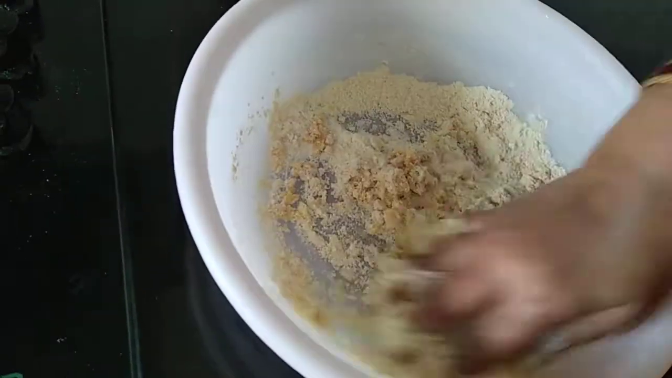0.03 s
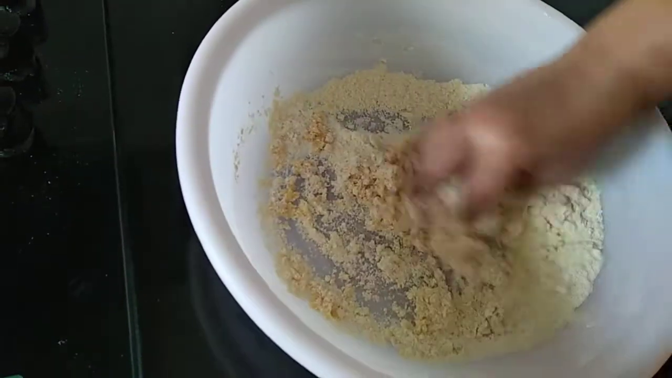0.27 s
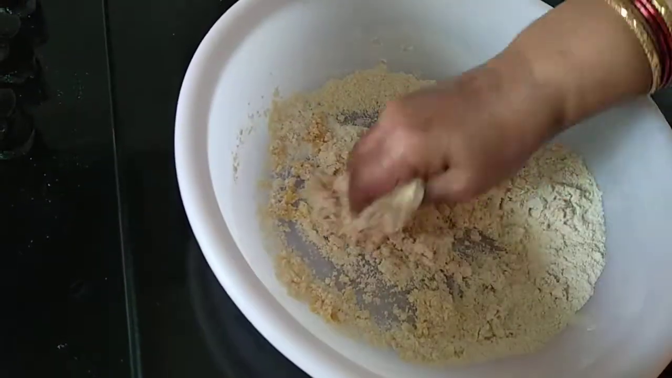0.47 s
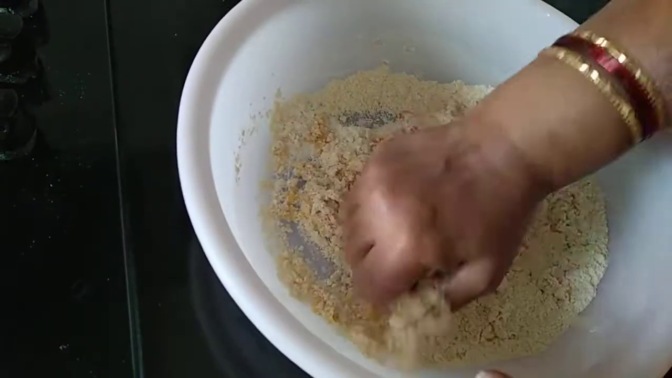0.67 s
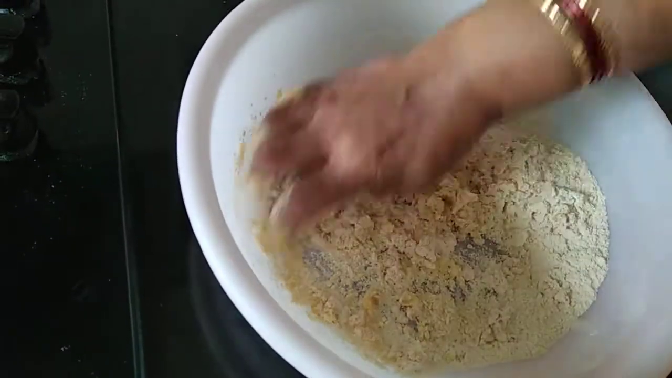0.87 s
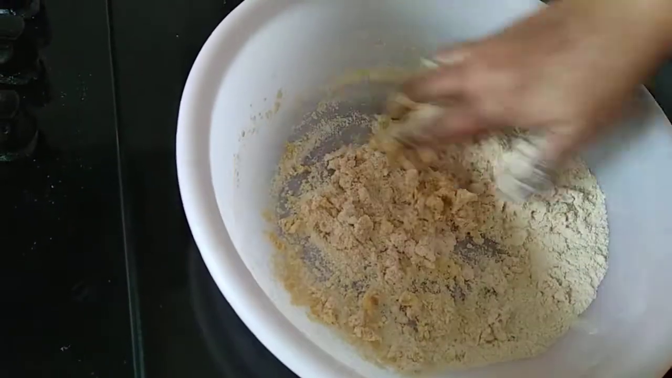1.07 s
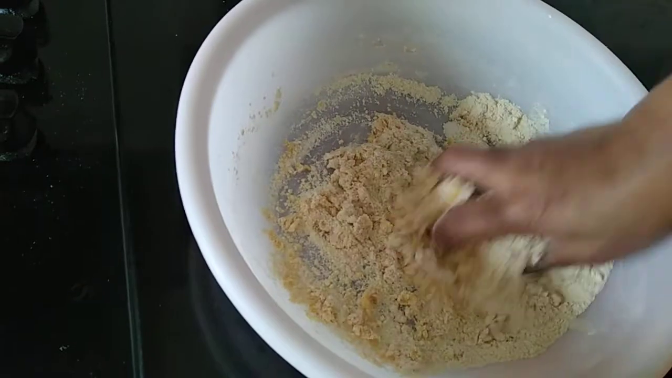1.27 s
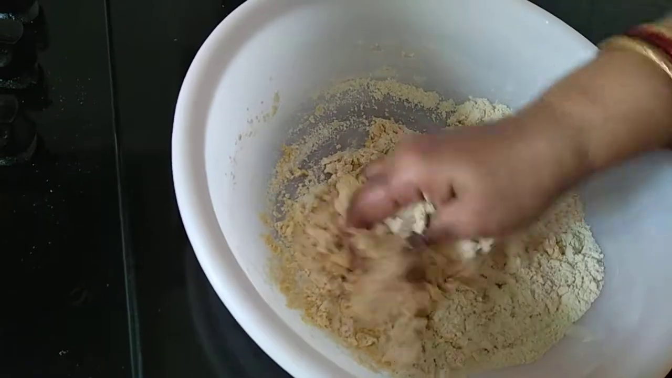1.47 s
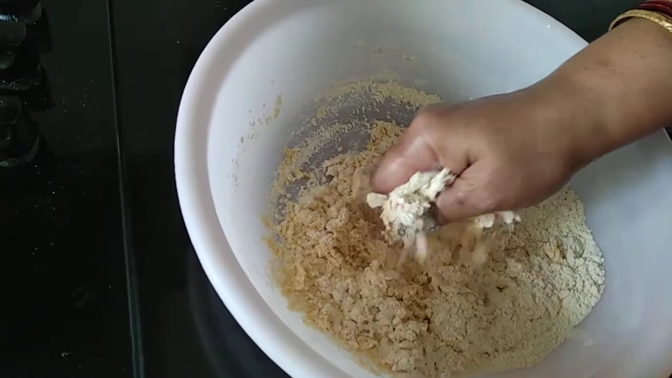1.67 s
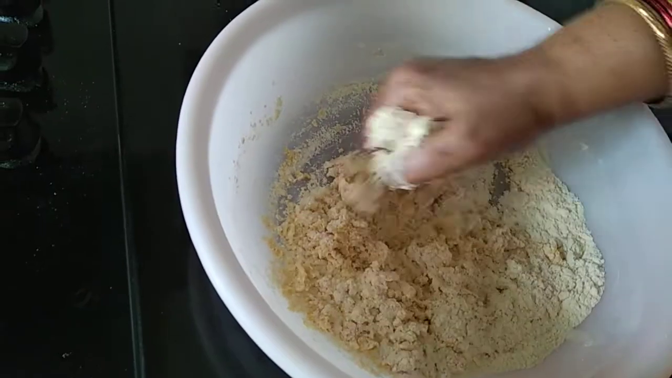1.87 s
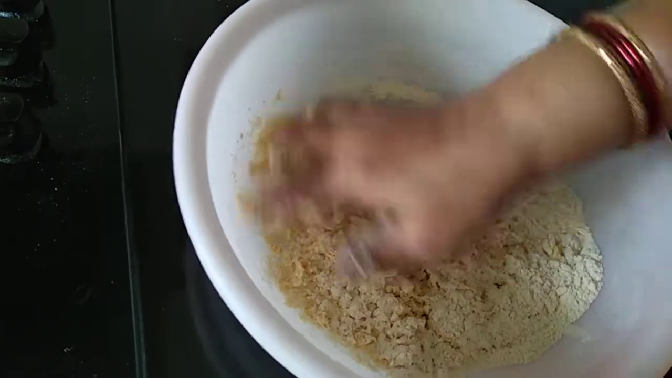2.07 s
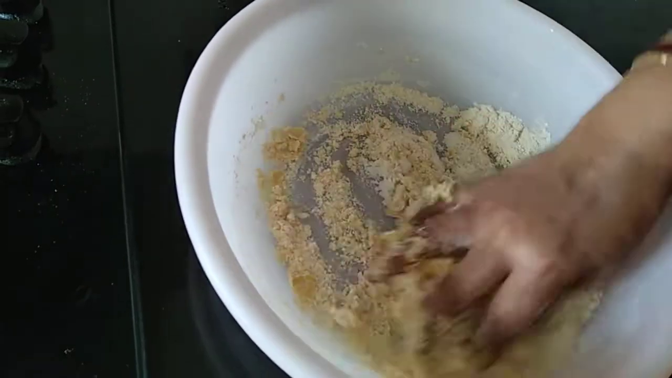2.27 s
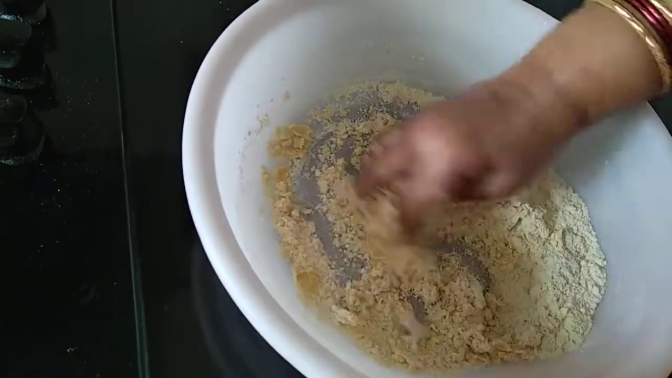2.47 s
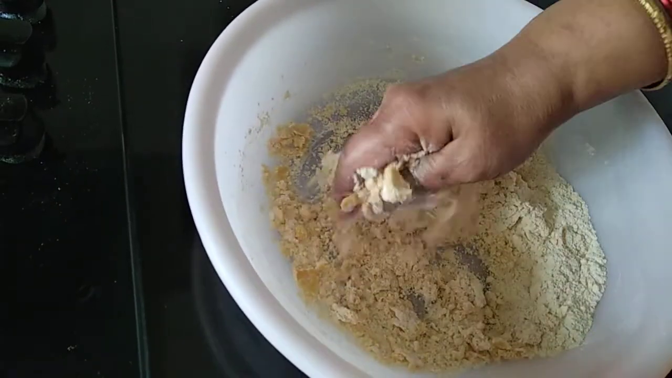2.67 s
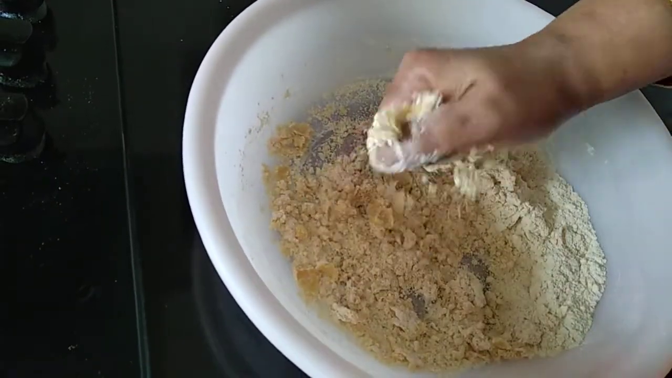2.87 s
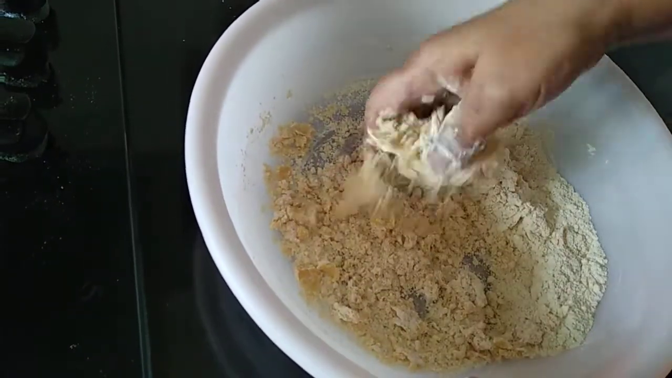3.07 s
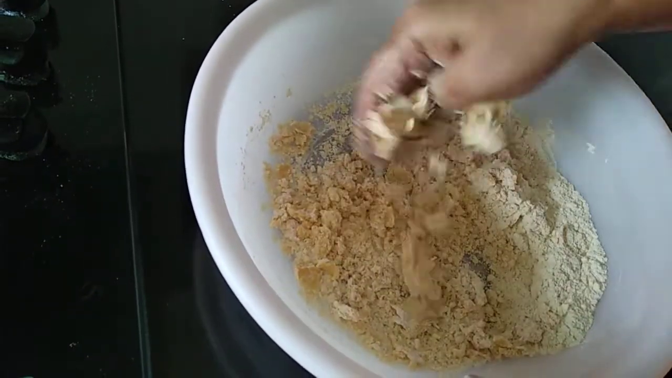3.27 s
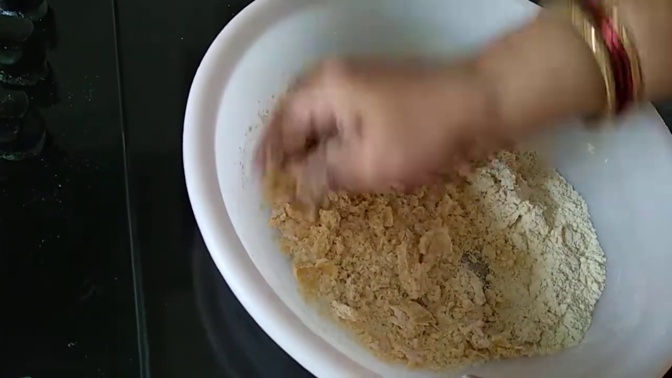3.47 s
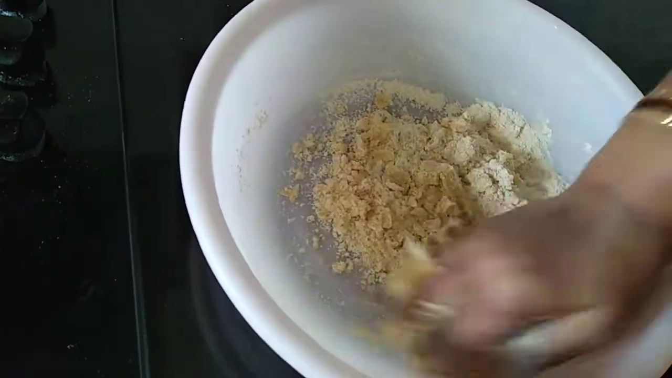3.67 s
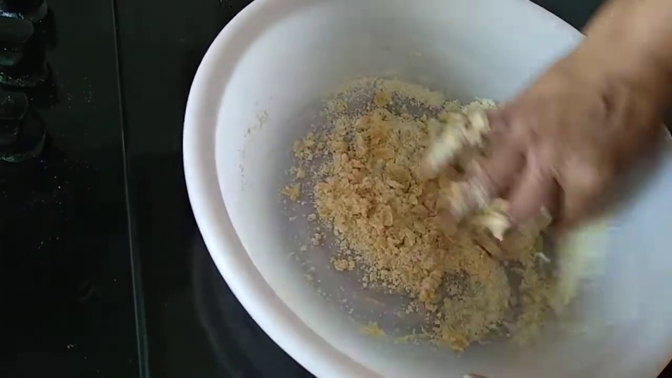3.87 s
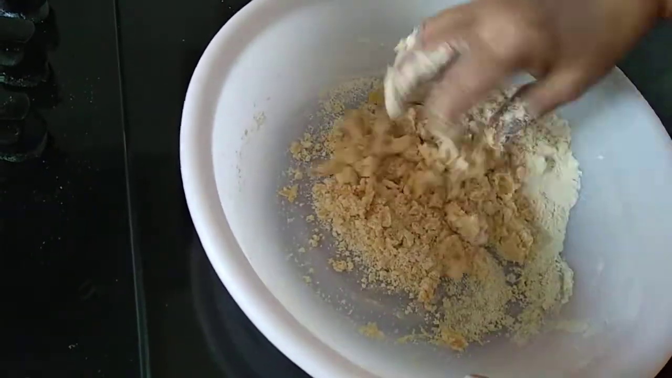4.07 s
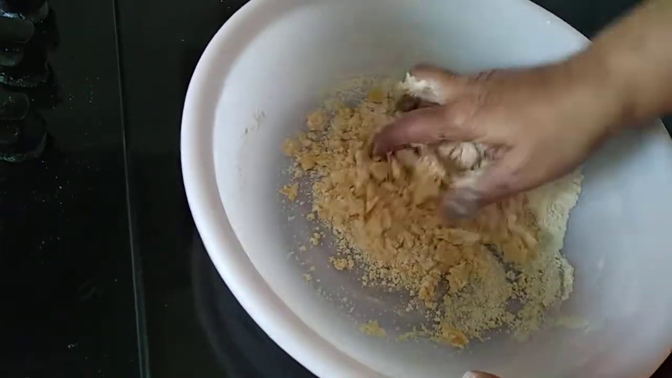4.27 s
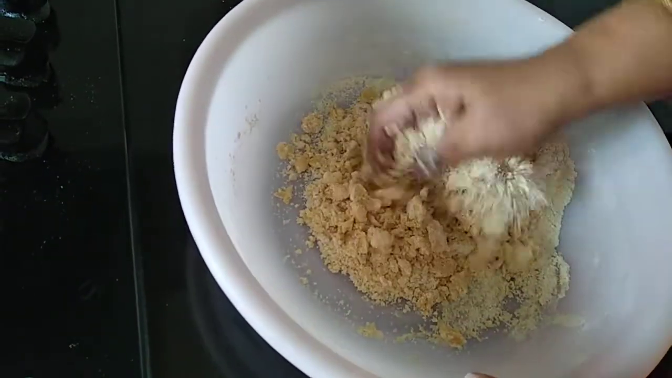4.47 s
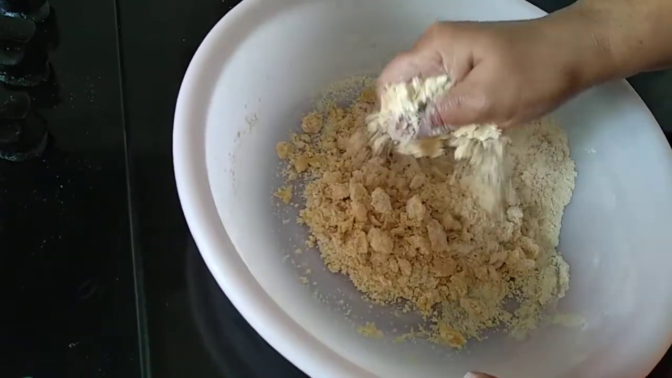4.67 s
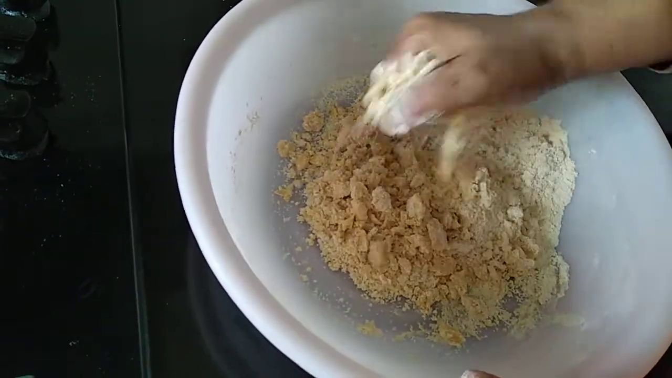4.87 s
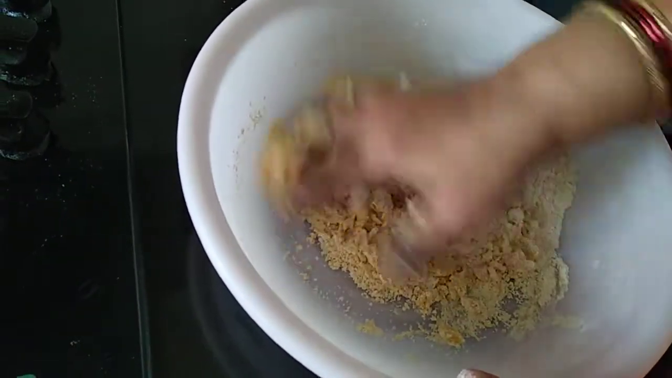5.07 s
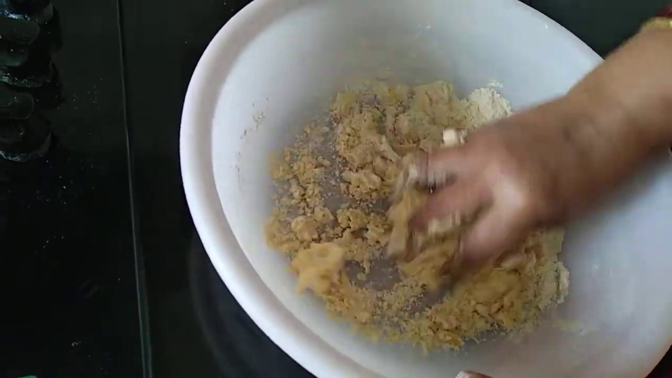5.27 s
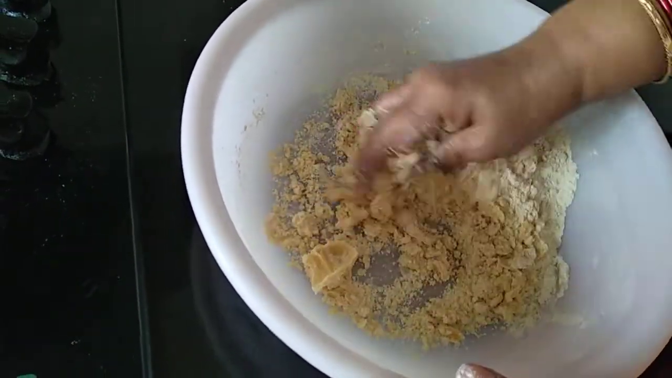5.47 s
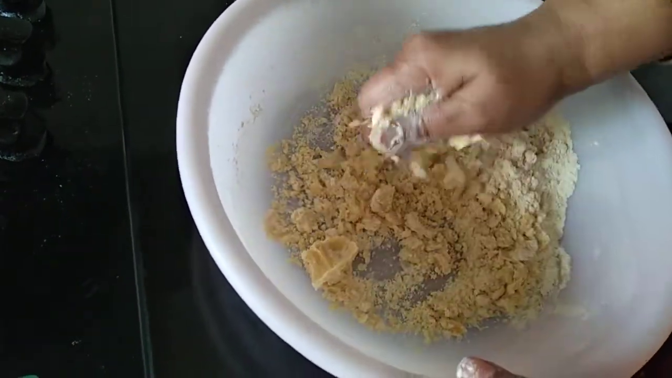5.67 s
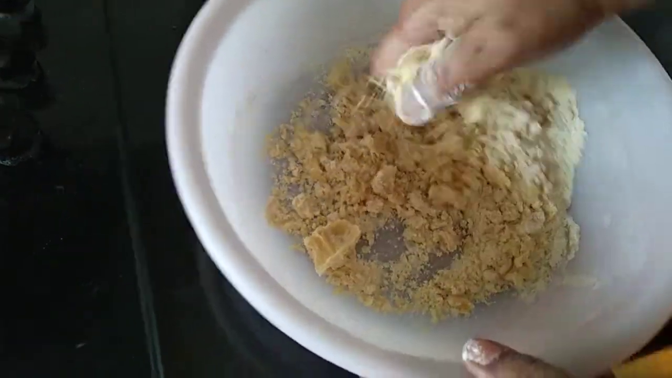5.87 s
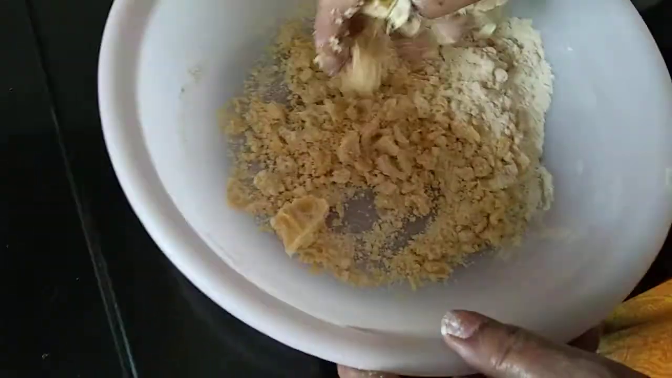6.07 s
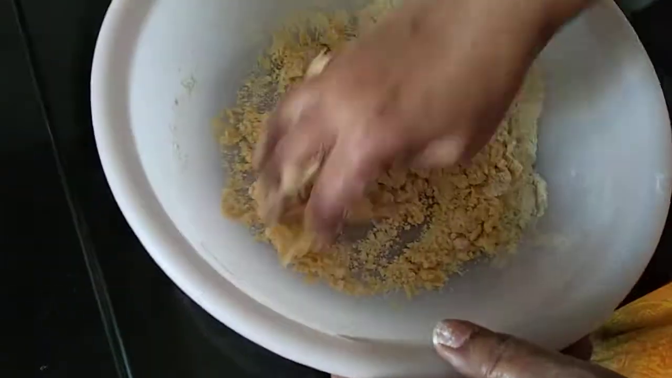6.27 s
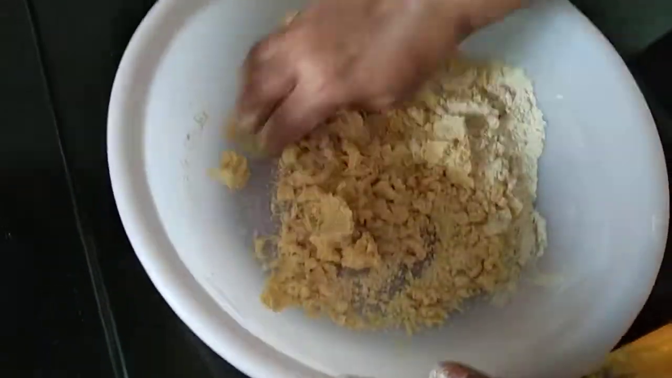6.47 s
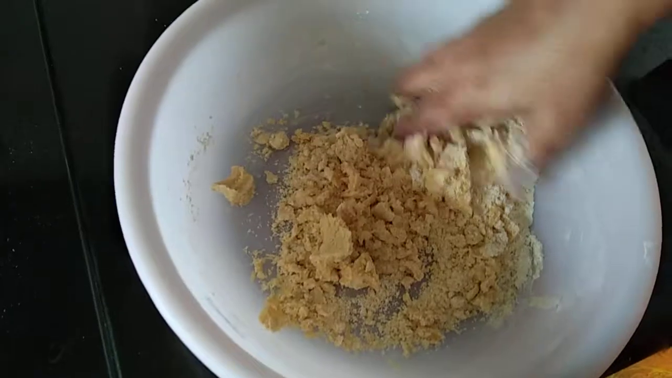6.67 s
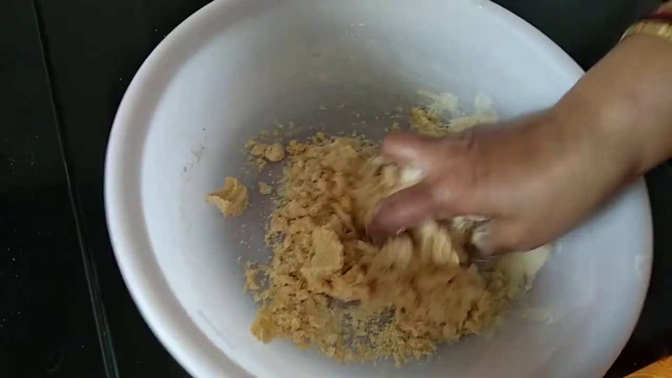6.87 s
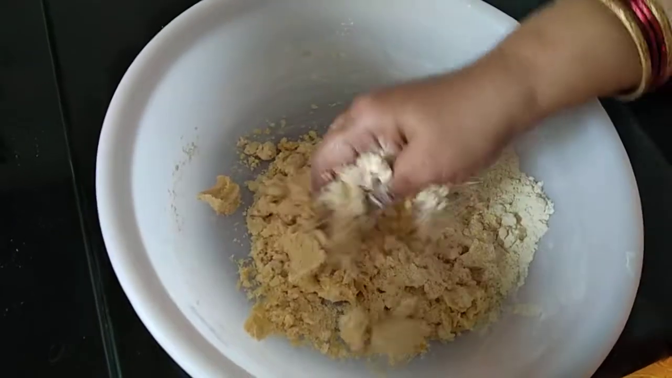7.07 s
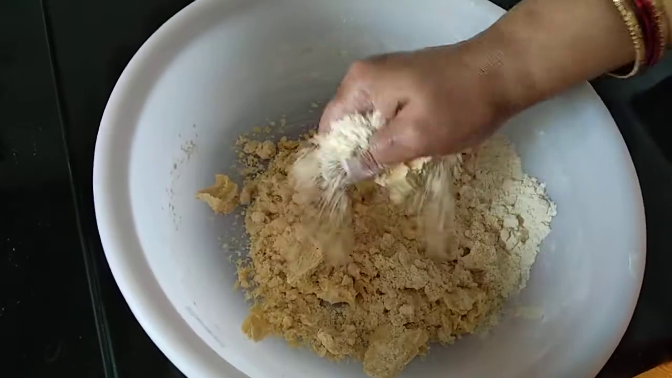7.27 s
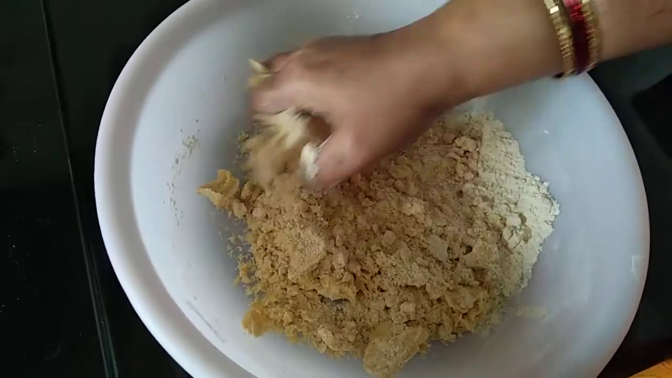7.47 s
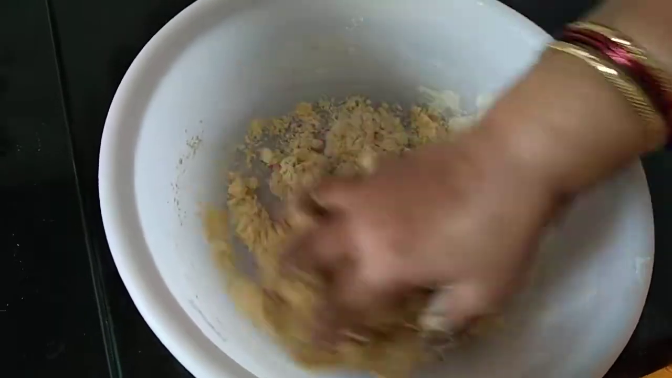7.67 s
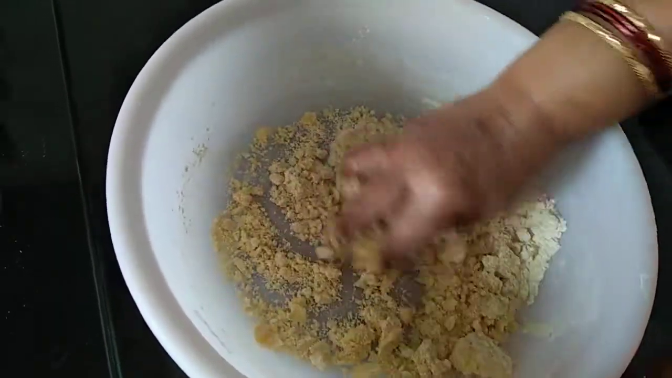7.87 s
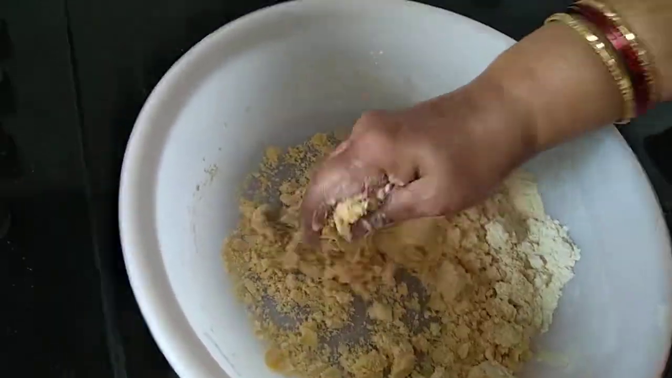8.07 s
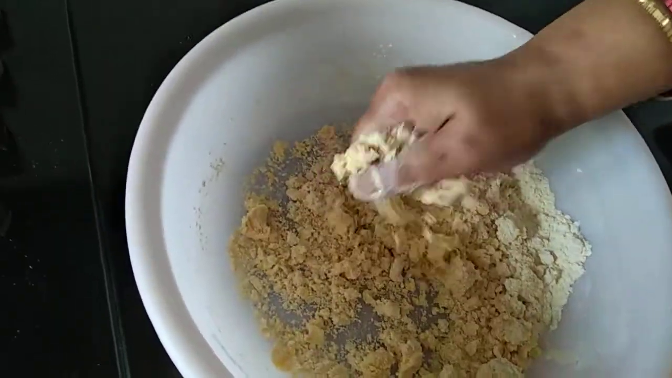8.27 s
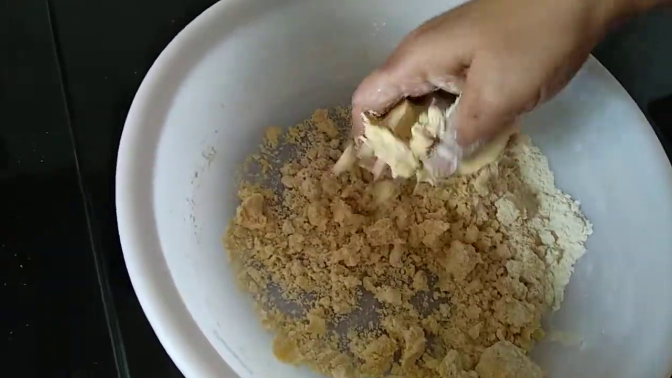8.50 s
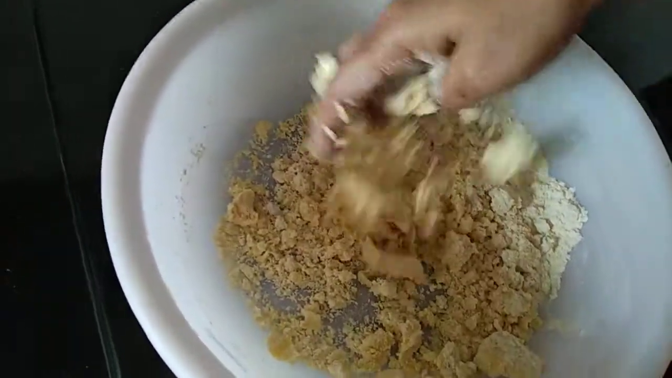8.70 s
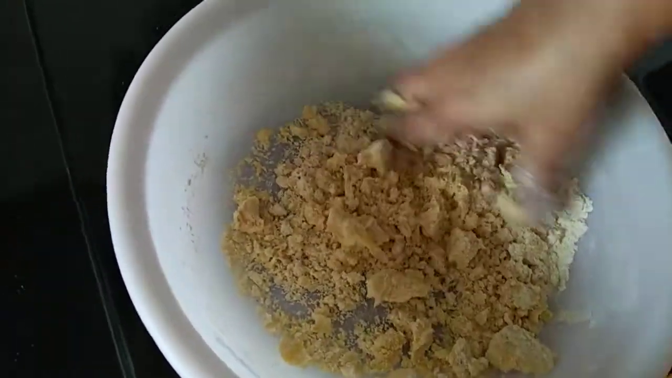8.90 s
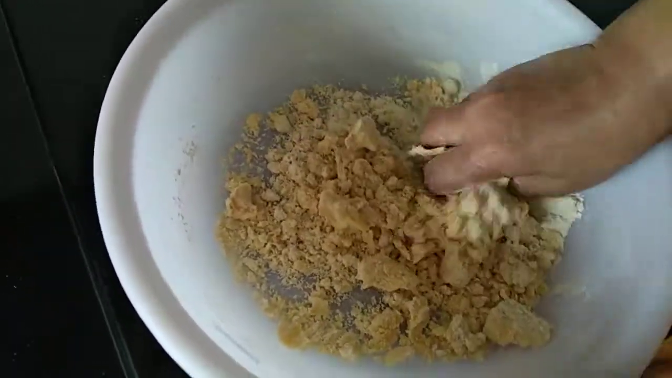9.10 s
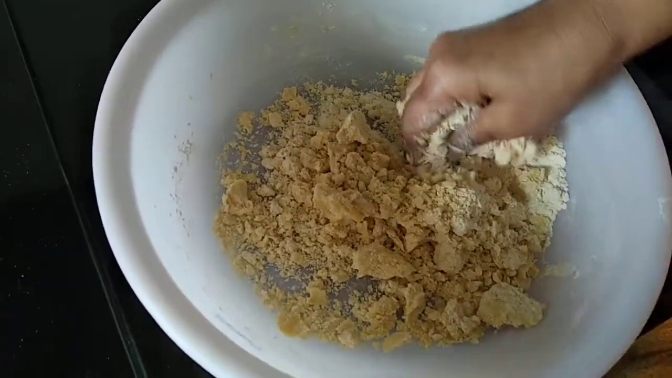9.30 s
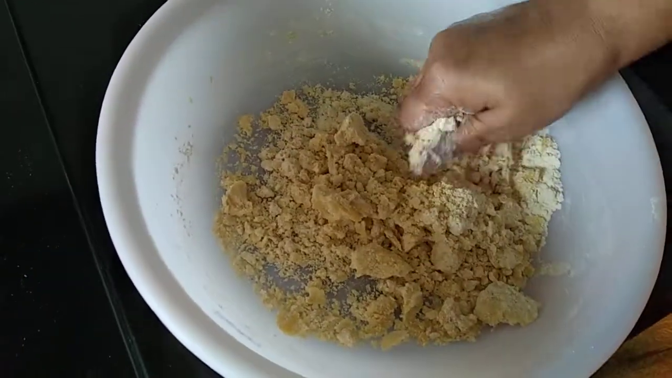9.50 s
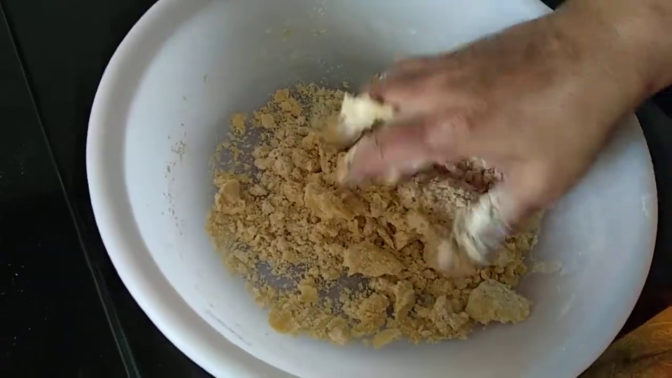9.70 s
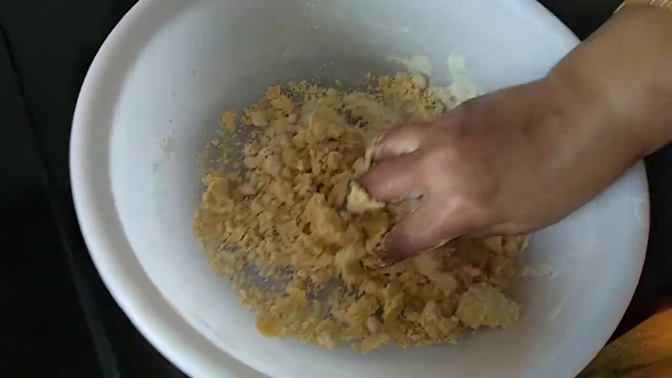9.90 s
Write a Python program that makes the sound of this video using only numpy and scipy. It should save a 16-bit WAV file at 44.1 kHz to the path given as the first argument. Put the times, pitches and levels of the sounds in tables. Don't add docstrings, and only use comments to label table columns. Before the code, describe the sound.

A hand rubs oily flour in a plastic basin on a stone counter, heard close in stereo by a phone with slightly thin, patchy treble. Light scrapes open the scene, bangles chime very faintly around 0.6, and a hard gritty stroke with a sharp tick lands at 0.9, continuing to about 1.4 with a knock. After a lull, a thump and scrape come at 2.05, fading by 2.5. Near silence follows until a strong drag at 3.4 to 3.9; the basin then rocks hollowly to 4.4, with knocks around 4.25. Another scoop arrives at 5.05. At 6.4 to 7 crumbs scrape and lumps patter quickly. A sharp knock, thumps and scraping fill 7.55 to 8. Soft palm brushes follow at 8.3 and 8.7, then shorter scrapes and knocks from 8.85 to 9.25, dying away. Low motor hum, hiss and swelling traffic rumble stay faintly behind.

```python
import sys
import numpy as np
from scipy import signal
from scipy.fft import rfft, irfft
from scipy.io import wavfile
from scipy.ndimage import uniform_filter1d, minimum_filter1d, map_coordinates

SR = 44100
rng = np.random.default_rng(int(sys.argv[2]) if len(sys.argv) > 2 else 0)


def level_to_linear(level):
    exponent = np.asarray(level, float) / 20
    return 10 ** exponent


def dump_mix(stems):
    frames = np.atleast_2d(stems).T
    limited = np.clip(frames, -1, 1)
    pcm = np.round(limited * 32767).astype(np.int16)
    wavfile.write(sys.argv[1], SR, pcm)


N = 438354
HZ = np.fft.rfftfreq(N, 1 / SR)
SIDES = np.array([[1], [-1]])
MIC_LAG_SAMPLES = 8.9
CONTROL_STEP = 32

# freq_hz, level_db_per_hz
KITCHEN_SPECTRUM = [(62, -18), (105, -6), (244, -7), (313, -7), (363, -8), (530, -12.5), (589, -13.5),
                    (758, -13.5), (1020, -15), (3300, -26), (5710, -30), (9260, -25.5), (13000, -29.5),
                    (16000, -30.5)]
# freq_hz, likeness
KITCHEN_LIKENESS = [(60, 1), (130, 0.99), (290, 1), (640, -0.19), (1410, 0.97), (3100, 0.2), (6820, -0.42),
                    (15000, -0.0)]
# freq_hz, level_db_rms
MOTOR_LINES = [(323.0, -78), (588, -78.5), (753.7, -91.5), (1040, -84.5)]
# start_s, level_db
TRAFFIC_LEVEL = [(0.0, -59.5), (0.61, -65.5), (0.88, -61.5), (1.88, -67), (4.12, -66.5), (4.68, -66),
                 (4.95, -57), (5.29, -63), (5.81, -62), (6.23, -67), (6.7, -55.5), (7.31, -67.5),
                 (9.08, -61), (9.52, -69), (9.94, -62)]
# start_s, length_s, level_db, rise_db_per_s, fall_db_per_s
COUNTER_DRONE = (4.09, 0.38, 10.3, 38, 35)
# start_s, peak_db, pitch_hz
HOUSE_SURGES = [(0.111, -53, 63.6), (0.389, -47, 53.8), (0.543, -54, 66.5), (0.744, -46.5, 57.7),
                (0.873, -40, 67), (1.474, -49, 69.5), (1.818, -52, 64.5), (2.06, -44.5, 97.4),
                (2.187, -57, 69), (2.493, -56, 60.6), (2.648, -48, 63.3), (2.977, -52.5, 70.7),
                (3.782, -50, 75.5), (4.937, -50.5, 68.4), (5.084, -51, 67.3), (5.363, -63, 64),
                (5.492, -51, 61), (5.862, -48, 55.4), (6.096, -58, 72.7), (6.233, -47, 61.3),
                (6.472, -48, 51.1), (6.701, -47, 49), (6.911, -51, 61.9), (7.378, -56, 72),
                (7.581, -38.5, 93.1), (7.712, -57, 84.7), (8.044, -52, 51.1), (8.373, -59, 45.8),
                (8.852, -52, 51.7), (8.966, -52, 81.5)]
# start_s, peak_db, pitch_hz, t60_s
BANGLE_CHIMES = [
    (.63, -48, 9333, 0.34),
    (.72, -53, 4040, 0.65),
    (.76, -52.5, 7830, .5),
    (.63, -56, 7400, 0.2),
    (7.295, -63.5, 3760, 0.49),
]
# start_s, peak_db, pitch_hz, t60_s
BASIN_THUMPS = [(0.409, -41, 55, 0.055), (0.875, -44.5, 65, 0.28), (0.951, -50, 56.2, 0.12),
                (2.062, -33, 99, 0.1), (2.127, -53, 95.5, 0.18), (2.655, -45.5, 68.1, 0.11),
                (6.474, -47.5, 50.1, 0.16), (7.549, -37, 96.4, 0.3), (7.585, -33, 91.6, 0.17),
                (7.738, -43.5, 87.6, 0.036), (8.849, -41, 49.6, 0.069), (8.978, -44, 85, 0.078)]
# start_s, peak_db, pitch_hz, t60_s
BASIN_ROCKS = [(2.064, -29.5, 188, 0.044), (2.126, -43.5, 185, 0.12), (3.439, -45, 237, 0.069),
               (3.933, -32, 302, 0.11), (3.954, -34.5, 315.5, 0.28), (3.994, -53, 290, 0.091),
               (4.014, -34.5, 363, 0.092), (4.029, -43.5, 354, 0.12), (4.057, -34.5, 318, 0.09),
               (4.087, -38, 308, 0.14), (4.159, -35.5, 319, 0.046), (4.249, -59, 204, 0.079),
               (4.301, -45, 166, 0.041), (4.394, -46, 223, 0.06), (5.042, -41, 318, 0.055),
               (6.948, -43, 177, 0.12), (7.0, -42, 183, 0.033), (7.04, -41, 197, 0.054),
               (7.589, -31, 211, 0.061), (7.609, -47, 170, 0.036), (7.655, -36, 297, 0.071)]
# start_s, peak_db, pitch_hz
BASIN_SHIFTS = [(0.923, -52, 210), (0.999, -50, 316), (1.069, -61, 318), (1.499, -59, 197),
                (1.899, -63, 143), (2.179, -67, 143), (4.599, -70, 293), (4.898, -57.5, 445),
                (5.699, -55, 198), (5.759, -54, 303), (6.323, -58.5, 183), (6.55, -63, 336),
                (6.708, -52, 287), (6.779, -70, 143), (6.919, -52, 176), (6.97, -63, 226),
                (8.879, -53, 143), (9.224, -52.5, 336)]
# start_s, peak_db, pitch_hz, t60_s
FINGER_KNOCKS = [(0.309, -41.5, 1110, 0.033), (1.184, -49, 900, 0.033), (1.423, -28.5, 1050, 0.042),
                 (3.839, -46, 1010, 0.028), (4.244, -36, 1120, 0.043), (4.255, -33, 795, 0.046),
                 (5.044, -52, 990, 0.034), (6.949, -42, 776, 0.049), (7.51, -46.5, 800, 0.034),
                 (7.573, -25.5, 977, 0.019), (9.014, -34, 1540, 0.051), (9.046, -38, 817, 0.078),
                 (9.227, -31.5, 970, 0.028), (9.235, -37.5, 790, .05), (.06, -49.5, 920, 0.035),
                 (.975, -41.5, 790, 0.075), (2.465, -48.5, 840, .04), (6.327, -43, 1070, 0.019)]
# start_s, peak_db, pitch_hz, t60_s, left_minus_right_db
NAIL_TICKS = [(0.8784, -10, 4360, 0.0079, 4.5), (2.066, -18, 2600, 0.015, 6),
              (3.2244, -49, 8000, 0.013, 2.5), (3.2324, -41, 2020, 0.0092, 4), (3.39, -62, 5000, .012, 1),
              (4.1938, -22, 7700, 0.015, 1.5), (5.0455, -23.5, 1600, 0.0088, 6),
              (6.2018, -38, 8700, 0.011, 2), (6.39, -28, 4760, 0.01, 3), (7.5724, -25, 7260, 0.012, 14),
              (8.024, -20.5, 2930, 0.0136, 2), (8.8453, -34, 3860, 0.011, -9),
              (9.227, -20.5, 2010, 0.015, 10)]
# start_s, peak_db, pitch_hz, t60_s
CRUMB_RUSTLES = [(2.99, -54.5, 10340, 0.085), (3.113, -52.5, 6000, 0.052), (3.258, -53.5, 5020, 0.04),
                 (4.522, -43.5, 9280, 0.013), (4.9039, -49, 9140, 0.15), (4.94, -47, 1550, 0.051),
                 (4.9776, -41, 2370, 0.054), (6.3294, -42, 3650, 0.04), (7.505, -42, 9000, .05),
                 (4.035, -41, 10900, .05), (4.833, -54.5, 10800, .03), (.295, -46, 1160, 0.042),
                 (4.183, -42, 1470, 0.074), (9.0122, -29.5, 2240, 0.14)]
# start_s, peak_db, pitch_hz, t60_s
PALM_BRUSHES = [(1.802, -46.5, 8250, 0.33), (1.88, -49.5, 8000, 0.5), (8.292, -44, 2500, 0.12),
                (8.32, -46, 2600, 0.11), (8.362, -48, 2600, 0.11), (8.388, -51.5, 2500, 0.093),
                (8.415, -55, 2500, .1), (8.685, -54, 2600, 0.27), (8.74, -46.5, 2600, 0.16),
                (8.775, -57, 2600, .14), (.66, -46.5, 1700, 0.076), (.69, -43, 5900, .25),
                (.81, -48, 1956, 0.1), (7.478, -48, 1760, 0.13), (7.315, -60, 3220, 0.51)]
# start_s, peak_db, pitch_hz
ROLLING_LUMPS = [(0.898, -40, 806), (1.005, -36, 960), (1.049, -38, 790), (1.099, -41, 1050),
                 (2.033, -49, 1280), (3.486, -45.5, 1260), (3.532, -42.5, 800), (3.635, -42, 774),
                 (4.189, -54.5, 754), (5.078, -56.5, 764), (5.168, -49.5, 1230), (6.456, -50, 776),
                 (6.489, -41, 860), (6.518, -48, 810), (6.557, -39, 980), (6.607, -47, 1020),
                 (6.634, -44, 776), (6.669, -44, 760), (6.722, -41, 770), (6.773, -44, 820),
                 (6.814, -49, 805), (6.914, -51, 755), (7.747, -36.5, 1260), (7.812, -46, 1240),
                 (7.857, -40, 1130), (7.929, -48, 778), (8.853, -47, 780), (8.944, -47.5, 778)]
# start_s, length_s, scrape_db, dust_db, wall_weight_db
HAND_LANDINGS = [(.622, 0.13, -66.5, 19.5, -6.5), (.877, 0.16, -30.5, -2.5, -4.5),
                 (1.805, 0.14, -71.5, -1, -4.5), (2.042, 0.026, -50.5, 6, 7), (2.064, 0.033, -37, -2, 2.5),
                 (3.426, 0.02, -50.5, -3, -2), (3.45, .04, -42.5, -1.5, 0), (4.197, 0.061, -49, 11.5, 6.5),
                 (5.043, 0.11, -38.5, 1, 0.5), (6.2, 0.079, -58, 12.5, 5), (6.393, 0.03, -38.5, 1.5, -4),
                 (7.553, .025, -47.5, -0.5, -0.5), (7.58, 0.021, -42, 4.5, 1), (7.868, 0.045, -41.5, 2, 3),
                 (8.297, 0.059, -61, 10, -6.5), (8.677, 0.078, -69.5, 11.5, 1),
                 (8.846, 0.074, -41.5, -1.5, 2.5), (9.015, 0.053, -43.5, 2.5, 2.5)]
# start_s, length_s, scrape_db, dust_db, wall_weight_db
HAND_PUSHES = [(0.0, 0.079, -38, 2.1, -3), (.1, 0.094, -42, 3.2, -4.5), (.4, 0.066, -56, 1.3, -1.5),
               (.7, 0.082, -61.5, 9, -1), (.985, 0.17, -34, 1.4, 0.5), (2.15, 0.044, -33, 0.71, -2.5),
               (2.23, 0.079, -39, 1.6, -1.5), (2.3, 0.21, -44, 4.8, 0), (4.26, 0.052, -44.5, 1.8, 4),
               (4.35, 0.061, -46.5, 2.2, 3), (5.11, 0.07, -40.5, 1.9, -1.5), (5.19, 0.15, -43, 3.7, -1),
               (5.33, 0.089, -47.5, 3.7, 1), (6.59, 0.13, -36, 2.7, 1), (7.63, 0.13, -36.5, 1.3, 1),
               (7.96, 0.0096, -48.5, 3.7, 2), (8.025, 0.022, -56, 3.5, -11), (8.93, 0.025, -36, 1.5, 2.5)]
# start_s, length_s, scrape_db, dust_db, wall_weight_db
HAND_DRAGS = [(.23, 0.09, -40, 1.5, -1), (1.24, 0.18, -46.5, -0.5, 0), (1.37, 0.059, -48.5, 2, 0.5),
              (3.485, 0.14, -31.5, -1.5, -1.5), (3.66, 0.1, -41.5, 8, 2), (3.78, 0.097, -42, 8, 2.5),
              (3.9, 0.034, -45.5, 1.5, 3.5), (3.97, 0.052, -60.5, 3, 4.5), (4.95, 0.049, -75.5, 2, -8),
              (6.31, 0.11, -56.5, 1.5, 3.5), (6.435, .12, -31.5, 1, -2.5), (6.765, 0.12, -44.5, 0.5, 1),
              (6.9, 0.081, -45, 2, 3.5), (7.79, 0.1, -40, 2.5, -1), (8.845, .01, -73, -10, -6),
              (9.18, 0.03, -50, -2, -1.5), (3.308, 0.0074, -75.5, 8.5, -4.5), (7.03, 0.053, -57.5, 3.5, -7),
              (5.8, 0.11, -83.5, 4.5, -5.5), (9.93, .03, -53, -8, -3.5)]
# start_s, length_s, scrape_db, dust_db, wall_weight_db
HAND_FLICKS = [(9.228, 0.0033, -51.5, -2, 6), (3.234, .003, -76, 7.5, -7), (1.72, 0.078, -80.5, 5, 3.5),
               (8.863, 0.0096, -41, -4, 2), (8.893, 0.015, -38, 3.5, 3), (4.05, .12, -65, -11.5, 7),
               (9.872, 0.046, -63, -11, -2), (3.6, 0.17, -76, 8, 1), (4.77, 0.13, -83, 5, -3),
               (2.8, 0.1, -82, 9, -2), (5.68, 0.11, -84.5, 4.5, 1), (7.44, 0.03, -79, 4, 6),
               (1.179, 0.012, -50.5, 2, 10), (8.42, 0.35, -83.5, 11.5, -8), (9.36, 0.26, -84, 7, -8),
               (4.55, 0.5, -86.5, 8, -3), (8.78, 0.044, -85.5, 5, 0.5), (7.1, 0.27, -80, -0.5, -1)]
# rise_db_per_s, sag_db_per_s, fall_db_per_s
LANDING_SHAPE = (1930, 13, 144)
PUSH_SHAPE = (320, 12, 190)
DRAG_SHAPE = (475, -0.93, 227)
FLICK_SHAPE = (780, 3.2, 580)
# above_scrape_db, weight_share, dust_share, lift_off_factor
SCRAPE_LAYERS = [
    (-22.5, 2.6, 0.11, 3.9),
    (-10, 2.01, 0.088, 1.28),
    (-9.5, 0.46, 0.031, 1.6),
    (-5, 0.05, 0.038, 1.18),
    (-3.5, 0.05, 1.17, 1.09),
]
LAYER_EDGES_HZ = (650, 1300, 2400, 3900, 7000, 16300)
# freq_hz, level_db_per_hz
SCRAPE_SPECTRUM = [(290, -61.5), (500, -32), (621, -16.5), (773, -10.5), (1190, -14), (1570, -8),
                   (2040, -4.5), (2460, -2), (2770, -2.5), (4210, -3.5), (10100, 9), (14700, 3.5),
                   (16000, -1)]
# freq_hz, width_hz, level_db
WALL_MODES = [(760, 30, -6), (1550, 260, -2), (2400, 490, -14), (3220, 220, -13), (4050, 2540, -0.5),
              (5900, 71, -10.5)]
# start_s, left_lag_samples, drift_samples_per_s, likeness
HAND_STROKES = [(0, 5, -20, 0.17), (.6, 5.3, 3.5, .3), (.87, 8.24, 1, 0.71), (1.201, 3.2, -6, 0.19),
                (2.039, 7.7, -11.5, 0.3), (3.419, 7.3, -3, 0.56), (4.19, 6.4, -9.5, 0.28),
                (5.04, 6.7, -12, 0.18), (6.198, 9, 1, 0.25), (6.382, 8.6, 0.5, 0.72),
                (6.7, 6.8, -6.5, 0.14), (7.55, 8.5, -16.5, 0.53), (8.28, 7.7, -2.5, 0.35),
                (8.84, 9.4, 1.5, 0.53)]
# freq_hz, left_minus_right_db
MIC_PORTS = [(60, -1), (110, -0.5), (200, -1), (380, 2.5), (700, 2), (1290, -1), (2380, -0.5), (4400, 1),
             (8120, -5), (15000, 6.5)]


def unit(x):
    return x / np.sqrt(np.mean(x ** 2))


def across(points):
    hz, value = np.transpose(points)
    return np.interp(np.log(HZ + 1), np.log(hz), value)


def band(lo_hz, hi_hz, order=8):
    return 1 / np.sqrt((1 + (lo_hz / (HZ + 1)) ** order) * (1 + (HZ / hi_hz) ** order))


def walk(rate_hz):
    hold = int(SR / rate_hz)
    steps = np.repeat(rng.standard_normal(N // hold + 1), hold)
    return unit(uniform_filter1d(uniform_filter1d(steps, hold), hold)[:N])


def grain_spectrum(scatter_db):
    size_db = scatter_db * np.minimum(rng.exponential(size=N), 3.5)
    return rfft(unit(rng.standard_normal(N) * level_to_linear(size_db)))


def touch_db(start_s, length_s, rise, sag, fall):
    t = np.arange(0, N, CONTROL_STEP) / SR - start_s
    return -rise * np.maximum(-t, 0) - sag * np.clip(t, 0, length_s) - fall * np.maximum(t - length_s, 0)


def every_sample(db):
    return np.interp(np.arange(N), np.arange(0, N, CONTROL_STEP), db)


def hits(table, partners, rough, rise_s, gain_db, spread=1.71, alike=0, late=MIC_LAG_SAMPLES):
    out = np.zeros((2, N + SR))
    for start_s, db, hz, t60_s, *pan_db in table:
        t = np.arange(min(int(t60_s * SR) + 64, SR)) / SR
        fade = (1 - np.exp(-t / rise_s)) * np.exp(-np.log(1000) * t / t60_s)
        noise = rng.standard_normal((2, SR))[:, :len(t)]
        noise = noise + alike * (noise[0] - noise)
        ring = 0
        for ratio, partner_db in partners:
            ring = ring + level_to_linear(partner_db) * np.sin(2 * np.pi * min(hz * ratio, 0.45 * SR) * t)
        edges_hz = [hz / spread, min(hz * spread, 0.45 * SR)]
        b, a = signal.butter(2, edges_hz, "band", fs=SR)
        grit = unit(signal.lfilter(b, a, noise))
        blow = (ring + rough * grit) * fade
        side_db = sum(pan_db) / 2 * SIDES
        blow = blow / np.abs(blow).max() * level_to_linear(db + gain_db + side_db)
        for side, lag in enumerate([int(late), 0]):
            at = int(start_s * SR) + lag
            out[side, at:at + len(t)] += blow[side]
    return out[:, :N]


def with_t60(table, t60_s):
    return [(*row, t60_s) for row in table]


def ports(near, far, alike):
    share = np.clip(alike, 0, 1)
    rest = np.sqrt(1 - share ** 2)
    late = near * np.exp(-2j * np.pi * HZ * MIC_LAG_SAMPLES / SR)
    tilt = level_to_linear(across(MIC_PORTS) / 2)
    return np.array([(share * late + rest * far[0]) * tilt, (share * near + rest * far[1]) / tilt])


def motor_hum():
    hum = 0
    for hz, db in MOTOR_LINES:
        level = level_to_linear(db + 2.5 + 0.99 * walk(2.2))
        pitch_hz = hz * (1 + 0.00301 * walk(4.0))
        hum = hum + level * np.sin(2 * np.pi * np.cumsum(pitch_hz) / SR)
    return hum


def kitchen():
    far = [grain_spectrum(scatter_db=1.0), grain_spectrum(scatter_db=3.0)]
    air = ports(grain_spectrum(scatter_db=2.0), far, across(KITCHEN_LIKENESS))
    traffic_db = np.interp(np.arange(N) / SR, *np.transpose(TRAFFIC_LEVEL)) + 2.0 * walk(8.7)
    deep = unit(irfft(air * band(42, 60), N)) * level_to_linear(traffic_db - 3.0 + 1.1 * walk(9.8))
    upper = unit(irfft(air * band(70, 98), N)) * level_to_linear(traffic_db - 6.0 + 1.0 * walk(4.2))

    start_s, length_s, level_db, rise, fall = COUNTER_DRONE
    drone_db = every_sample(np.maximum(level_db + touch_db(start_s, length_s, rise, 0, fall), 0))
    air = air * level_to_linear(across(KITCHEN_SPECTRUM))
    room = irfft(air * band(105, 620), N) * level_to_linear(drone_db - 0.5 + 1.1 * walk(2.6))
    room = room + irfft(air * band(620, 2500), N) * level_to_linear(0.8 * walk(3.3))
    hiss = irfft(air * band(2500, 16000), N) * level_to_linear(1.6 * walk(9.0))
    return level_to_linear(-64) * unit(room + hiss) + deep + upper + motor_hum()


def house_surges():
    return hits(with_t60(HOUSE_SURGES, 0.45), [(1, 0)], rough=0.4, rise_s=0.025, gain_db=-2.5,
                spread=1.3, alike=0.3)


def basin_thumps():
    return hits(BASIN_THUMPS, [(1, 1.5), (2.1, -10.5)], rough=0.38, rise_s=0.0028, gain_db=1.5, alike=0.75)


def bangles():
    return hits(BANGLE_CHIMES, [(1, 0), (0.8, -12)], rough=0.6, rise_s=0.02, gain_db=0, spread=1.01, late=0)


def basin_on_stone():
    rocks = hits(BASIN_ROCKS, [(1.008, 7.0), (1.4, -1.5), (1.7, -14.5), (0.87, -7.0)],
                 rough=0.96, rise_s=0.0064, gain_db=-3.0, alike=0.61)
    shifts = hits(with_t60(BASIN_SHIFTS, 0.09), [(1, 5), (1.4, -7.5)],
                  rough=0.94, rise_s=0.006, gain_db=1.5, spread=1.4, alike=0.86)
    return rocks + shifts


def finger_knocks():
    return hits(FINGER_KNOCKS, [(1.016, 4.0), (1.0, -33.5), (1.97, 1.5), (1.6, -13.0), (1.0, -18.5)],
                rough=0.89, rise_s=0.00026, gain_db=3.0, spread=2.0)


def nail_ticks():
    return hits(NAIL_TICKS, [(0.92, 0.0), (0.78, -11.5), (0.11, -25.5)],
                rough=0.99, rise_s=0.0001, gain_db=-5.0)


def rustles_and_brushes():
    rustles = hits(CRUMB_RUSTLES, [(0.34, -7)], rough=1.0, rise_s=0.014, gain_db=0.0)
    brushes = hits(PALM_BRUSHES, [(0.94, -19.5)], rough=1.7, rise_s=0.006, gain_db=-1.0, spread=1.15)
    return rustles + brushes


def rolling_lumps():
    return hits(with_t60(ROLLING_LUMPS, 0.035), [(1, 10.5), (1.97, -2)],
                rough=1.2, rise_s=0.0013, gain_db=-1.0, spread=1.2)


def hand_db(above_db, weight, dust, lift):
    settle_db, settle_db_per_s = -42.5, 20
    moves = [(HAND_LANDINGS, LANDING_SHAPE), (HAND_PUSHES, PUSH_SHAPE),
             (HAND_DRAGS, DRAG_SHAPE), (HAND_FLICKS, FLICK_SHAPE)]
    power = 1e-14
    for table, (rise, sag, fall) in moves:
        for start_s, length_s, db, dust_db, weight_db in table:
            top_db = db + above_db + weight * weight_db + dust * dust_db
            contact_db = top_db + touch_db(start_s, length_s, rise, sag, fall * lift)
            trickle_db = top_db + settle_db + touch_db(start_s, length_s, rise, sag, settle_db_per_s)
            power = power + level_to_linear(contact_db) ** 2 + dust ** 2 * level_to_linear(trickle_db) ** 2
    return every_sample(10 * np.log10(power))


def sweep(pair):
    spread_s = 0.24
    rows = np.array(HAND_STROKES)
    t = np.arange(N) / SR
    start_s, lag, drift, alike = rows[np.searchsorted(rows[:, 0], t, side="right") - 1].T
    lag = np.clip(lag + drift * (t - start_s), 0, 12)
    lag = uniform_filter1d(lag, size=400) + 0.54 * walk(12.0)
    alike = alike * np.exp(-((t - start_s) / spread_s) ** 2 / 2) + 0.075
    alike = uniform_filter1d(np.clip(alike, 0, 0.95), size=400)
    late = map_coordinates(pair[1], [np.arange(N) - lag], order=3, mode="mirror")
    change = uniform_filter1d(alike * late + (np.sqrt(1 - alike ** 2) - 1) * pair[0], size=3)
    both = np.array([pair[0] + change, pair[1]])
    return irfft(rfft(both) * level_to_linear(across(MIC_PORTS) / 2 * SIDES), N)


def scrape():
    rings = 1
    for hz, width_hz, db in WALL_MODES:
        rings = rings + level_to_linear(db + 4) / (1 + ((HZ - hz) / width_hz * 2) ** 2)
    grains = np.array([grain_spectrum(scatter_db=2.5), grain_spectrum(scatter_db=2.5)])
    grains = grains * level_to_linear(across(SCRAPE_SPECTRUM)) * rings
    slip_db = 0.7 * walk(30.0) + 1.1 * walk(110.0)
    out = 0
    for k, layer in enumerate(SCRAPE_LAYERS):
        db = hand_db(*layer) + 2.5 + slip_db + 0.7 * walk(18.0)
        layer_band = band(LAYER_EDGES_HZ[k], LAYER_EDGES_HZ[k + 1], order=5)
        out = out + level_to_linear(db) * unit(irfft(grains * layer_band, N))
    return sweep(out) * level_to_linear(0.22 * walk(2.3) * SIDES)


def counter_echo(x, t60_s, wet_db):
    t = np.arange(int(t60_s * SR)) / SR
    tail = rng.standard_normal((2, len(t))) * np.exp(-np.log(1000) * t / t60_s) * (t > 0.003)
    tail = tail / np.sqrt(np.sum(tail ** 2) / 2)
    return x + level_to_linear(wet_db) * signal.fftconvolve(x, tail, axes=1)[:, :N]


def scene():
    basin = bangles() + basin_on_stone() + finger_knocks() + nail_ticks()
    basin = basin + rustles_and_brushes() + rolling_lumps() + scrape()
    low = (house_surges() + basin_thumps()) * level_to_linear(1.2 * SIDES)
    return kitchen() + low + counter_echo(basin, t60_s=0.25, wet_db=-12.0)


def phone_squeeze(x, contrast, patchy_db, hole_share, hole_db):
    hz, _, bins = signal.stft(x, SR, nperseg=1024)
    hz = hz[:, None]
    power = np.abs(bins) ** 2 + 1e-18
    around = uniform_filter1d(power, size=11, axis=1)
    kept = (power / around) ** (contrast / 2)
    kept = kept * np.sqrt(around / uniform_filter1d(power * kept ** 2, size=11, axis=1))

    rows = np.arange(len(hz)) // 4
    luck = rng.standard_normal((rows[-1] + 1, bins.shape[2]))
    luck = unit(uniform_filter1d(luck, size=6, axis=1))[rows]
    limit = hole_share - 0.35 + 0.62 * np.abs(np.log2((hz + 1) / 4600))
    lasting = -minimum_filter1d(-power, size=7, axis=1).min(axis=0)
    plain = lasting < 6 * uniform_filter1d(power, size=41, axis=1).max(axis=0)
    patch_db = patchy_db * luck + hole_db * np.clip((-luck - limit) * 4, 0, 1) * plain
    treble = np.clip((hz - 900) / 3000, 0, 1)

    bright = power[:, 40:].sum(axis=(0, 1))
    sudden = 1.0 * (bright > 6 * np.roll(bright, 2))
    steady = uniform_filter1d(sudden, size=3) == 0

    mid, side = [uniform_filter1d(uniform_filter1d(np.abs(bins[0] + k * bins[1]) ** 2, size=5, axis=0),
                                  size=6, axis=1) for k in (1, -1)]
    dropped = (mid < 0.3 * side) & (hz > 1100) & steady & plain
    bins = bins - (bins[0] + bins[1]) / 2 * dropped
    gain = (kept * level_to_linear(patch_db)) ** (treble * steady)
    return signal.istft(bins * gain, SR, nperseg=1024)[1][:, :N]


def band_limit(x):
    return signal.sosfilt(signal.butter(12, 16620, fs=SR, output="sos"), x)


def record(dry):
    squeezed = phone_squeeze(dry, contrast=0.75, patchy_db=2.0, hole_share=0.7, hole_db=-22)
    low_hz, top_hz = 32, 15830
    passed = 1 / (1 + (low_hz / (HZ + 1)) ** 6) * (HZ < top_hz)
    mix = irfft(rfft(squeezed) * passed, N)
    return band_limit(mix)


dry = scene()
out = record(dry)
dump_mix(out)
```